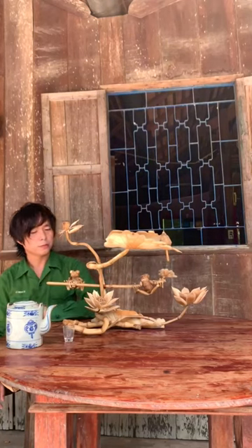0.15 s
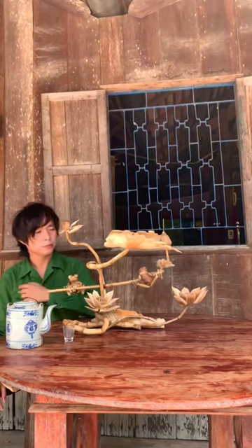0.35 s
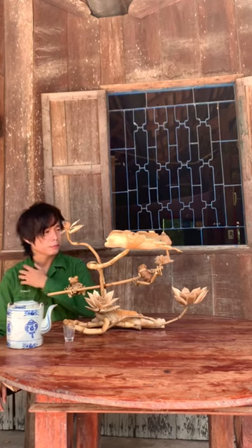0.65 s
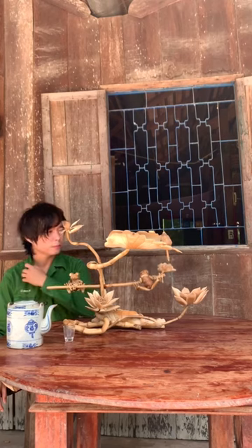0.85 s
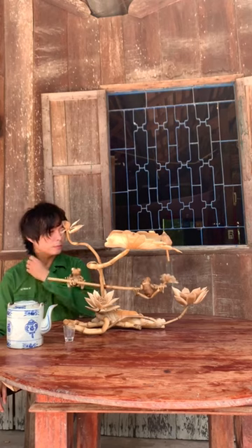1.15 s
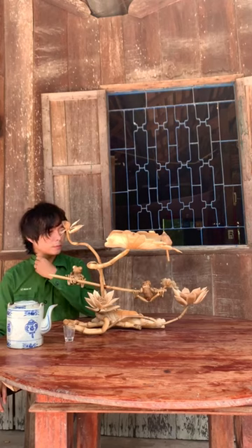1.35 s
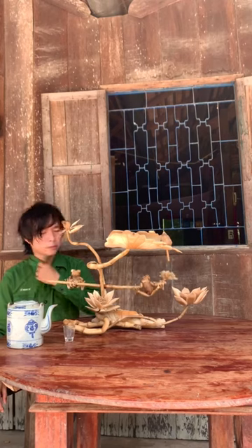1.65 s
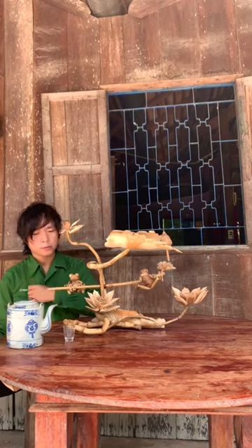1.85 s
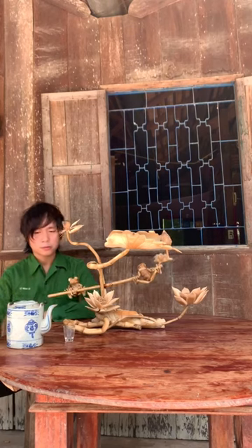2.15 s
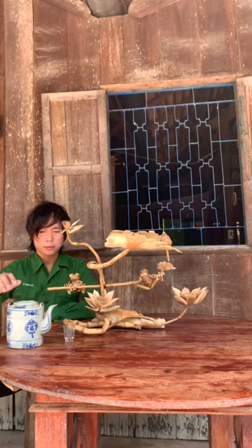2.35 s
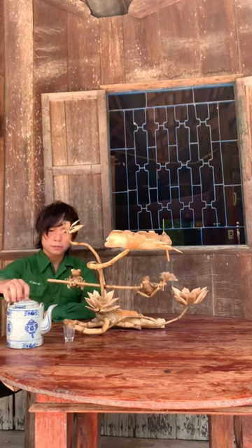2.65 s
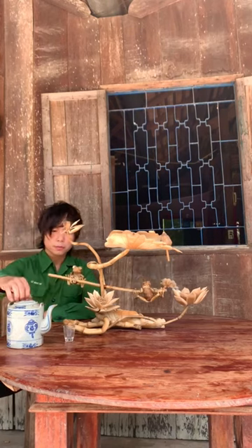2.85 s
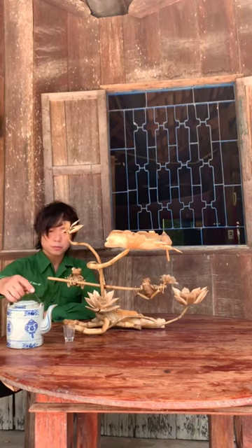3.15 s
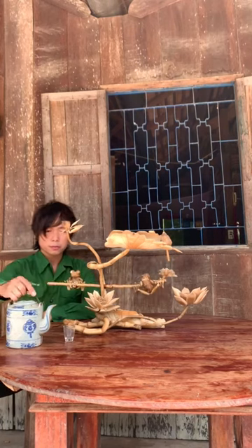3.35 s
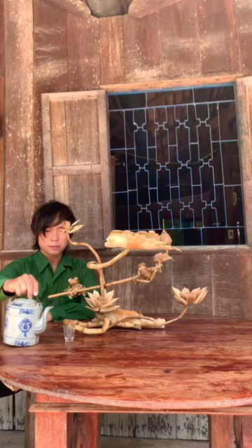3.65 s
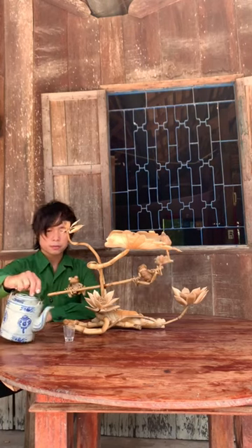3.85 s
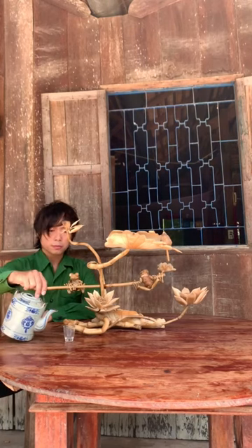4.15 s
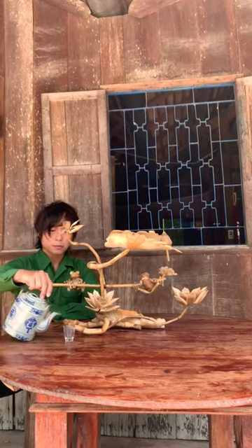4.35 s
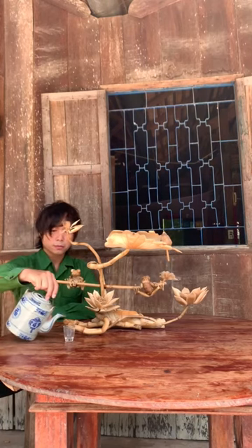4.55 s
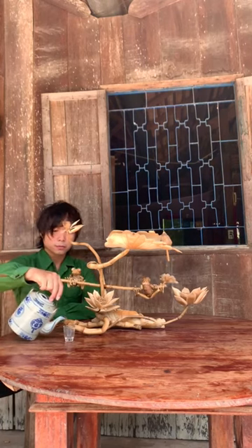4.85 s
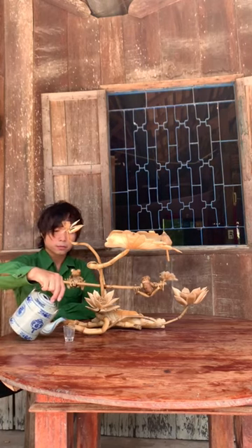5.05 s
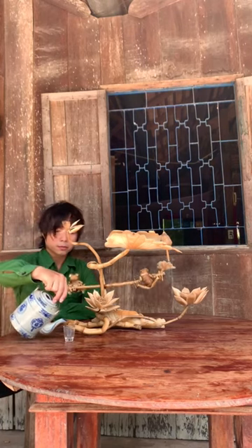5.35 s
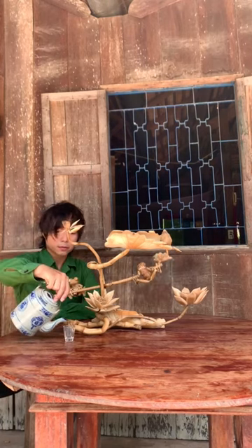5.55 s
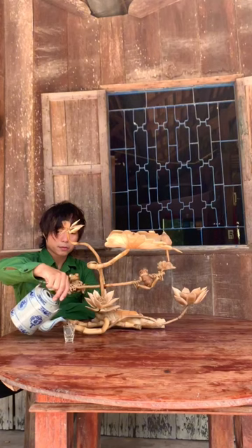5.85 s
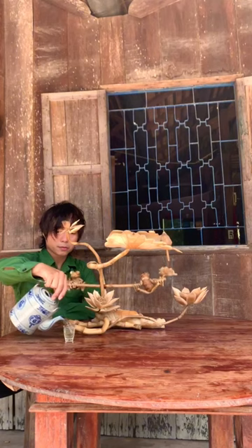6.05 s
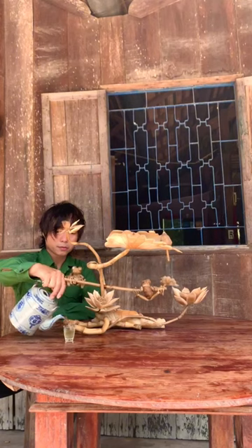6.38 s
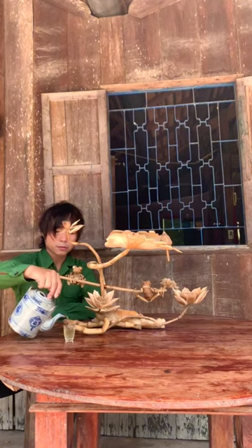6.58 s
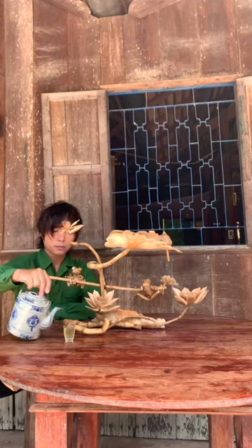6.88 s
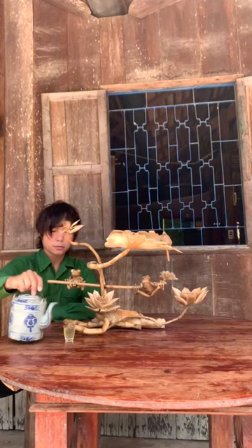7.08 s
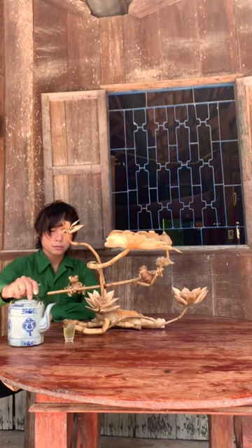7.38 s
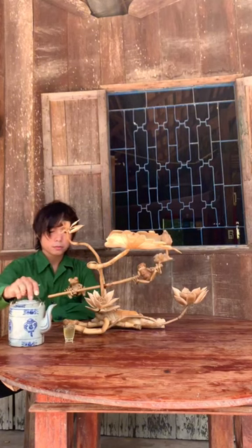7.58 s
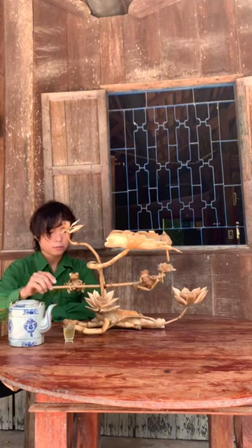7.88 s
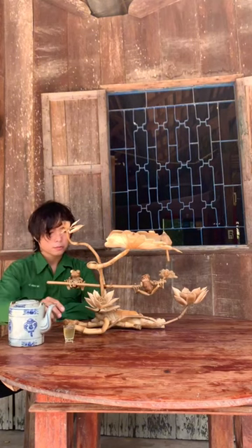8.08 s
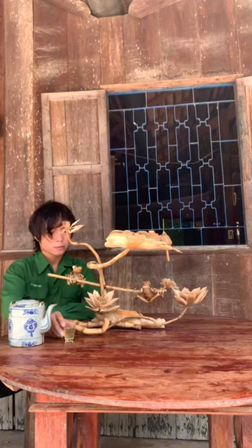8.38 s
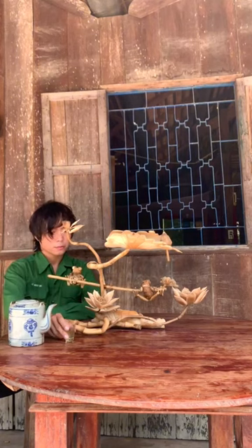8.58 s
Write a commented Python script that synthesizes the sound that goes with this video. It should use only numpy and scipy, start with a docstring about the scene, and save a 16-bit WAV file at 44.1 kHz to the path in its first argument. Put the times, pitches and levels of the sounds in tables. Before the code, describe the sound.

Small woody clicks come close to the microphone: a rattling cluster from one end of a bamboo seesaw, a crisp knock from the other, roughly every two seconds or a little less, with short round water plips between. The wooden table hums very briefly under some blows. Short plank-room reflections, steady airy hiss, and deep fluttering wind thuds that crowd together late, nearly masking a soft teapot set-down.

```python
"""In a plank room, a bamboo seesaw fed by dripping water tips back and forth on a wooden table.
Impacts excite damped modes: one end lands with a bright knock and bounces, the other in a rattling
run of taps; a teapot is set down and its wire handle falls. Drops and the table top ring as sines.
Shaped noise makes wind gusts, falling wobbles more wind at the microphone and a few handling thumps,
over the hiss of the open room; a thin sine whistle, perhaps an insect, sounds once."""
import sys
import numpy as np
from scipy import signal
from scipy.fft import rfft, irfft
from scipy.io import wavfile
from scipy.ndimage import uniform_filter1d

SR = 44100
rng = np.random.default_rng(int(sys.argv[2]) if len(sys.argv) > 2 else 0)


def inscribe(sig):
    """Save sig as 16-bit PCM at rate SR to the path in sys.argv[1].

    A 1-D sig is mono; a 2-D sig holds one channel per row.
    Samples are clipped to [-1, 1] before scaling.
    """
    pcm = np.round(np.clip(np.atleast_2d(sig).T, -1, 1) * 32767)
    wavfile.write(sys.argv[1], SR, pcm.astype(np.int16))


N = 384552  # samples

# Room hiss, relative spectrum: (frequency [Hz], level [dB])
HISS_SPECTRUM = [(150, -56), (300, -3), (500, -2.5), (900, -4.5), (1500, -2), (2500, -7), (4000, -5),
                 (5500, -9), (7500, -11.5), (10000, -14), (13000, -16), (14900, -21.5), (15400, -55),
                 (17000, -60)]
# Slow course of the hiss: (time [s], level [dB])
HISS_LEVEL = [(0, -49.5), (1.5, -49.5), (3, -48), (4.5, -50.5), (5.5, -51), (7, -52), (8.72, -52)]
# Phase of the left channel ahead of the right: (frequency [Hz], difference [half turns])
CHANNEL_PHASE = [(0, 0), (300, 0), (700, -.25), (1700, 0), (2800, .4), (4300, .6), (4900, 1), (5600, 1.4),
                 (6400, 1.95), (7400, 2), (8400, 2.5), (9400, 3), (10000, 3), (11900, 4), (12700, 4),
                 (14300, 5), (15000, 5), (15900, 5.7), (22050, 6)]
# Power share of the hiss that is unlike in the two channels: (frequency [Hz], share [0 to 1])
UNLIKE_SHARE = [(100, .002), (250, 0.068), (500, 0.72), (1000, 0.66), (2500, 1), (5000, 0.59),
                (6400, 0.027), (7400, 0.048), (8400, 0.18), (9300, 0.00018), (10200, 0.00023),
                (11000, 0.45), (12300, .02), (13300, .2), (14200, .002)]

# Deep wind noise, relative spectrum: (frequency [Hz], level [dB])
RUMBLE_SPECTRUM = [(15, -48), (25, -29), (35, -3), (50, 3.5), (80, 3.5), (120, -1), (170, -13.5),
                   (250, -29.5), (500, -120)]
# Faster wind flutter, relative spectrum: (frequency [Hz], level [dB])
FLUTTER_SPECTRUM = [(60, -90), (90, -31), (150, 6), (250, -1.5), (400, -7.5), (700, -28), (1100, -30.5),
                    (1600, -53), (3000, -120)]
# Strength of the wind as its deep rumble: (time [s], level [dB])
WIND_LEVEL = [(0, -49.5), (0.15, -45), (0.48, -55), (0.63, -38), (0.88, -39), (1.05, -51), (2.26, -50.5),
              (2.6, -49), (3.6, -53), (4.7, -50.5), (5.08, -52.5), (5.3, -39), (5.76, -38.5), (6.3, -46),
              (6.6, -39.5), (6.97, -43), (7.2, -38), (7.45, -39.5), (8.0, -42), (8.72, -42)]
# Sudden puffs of wind: (time of crest [s], deep thump level [dB], flutter level [dB])
PUFFS = [(0.295, -48, -62), (0.41, -38, -60), (0.46, -37, -46), (0.51, -43, -60), (0.649, -25.5, -42),
         (0.75, -29.5, -52), (0.85, -35, -61), (1.34, -34.5, -50), (1.504, -43, -48), (1.58, -46, -60),
         (2.21, -44, -41), (3.03, -49, -57), (3.215, -42.5, -67), (3.468, -45, -41), (3.86, -44.5, -56),
         (3.93, -43, -54), (4.49, -45, -65), (4.575, -42, -41.5), (4.78, -35, -60), (5.245, -33, -50),
         (5.293, -26, -38), (5.49, -40, -40.5), (5.66, -28.5, -43), (5.71, -42, -38.5), (5.83, -55, -50),
         (5.9, -28.5, -63), (6.03, -32.5, -47), (6.076, -40, -43), (6.166, -35, -38.5), (6.26, -36, -56),
         (6.371, -27.5, -28), (6.39, -23, -34), (6.476, -24, -37), (6.525, -30.5, -61), (6.585, -37, -48),
         (6.695, -32, -34), (6.725, -23.5, -38), (6.751, -30, -28), (6.79, -36, -35), (6.828, -29.5, -35),
         (6.9, -29, -41), (7.12, -31, -55), (7.2, -37, -36.5), (7.245, -26, -27), (7.295, -31, -31),
         (7.339, -34, -32), (7.48, -41, -36), (7.56, -42, -43), (7.68, -36, -35), (8.059, -32, -41.5),
         (8.33, -43, -39.5), (8.6, -37, -61), (8.715, -54, -36)]
FLUTTER_AT_DB, FLUTTER_FOLLOWS = -56.5, 0.36  # flutter in a wind of -50.5 dB; share of wind swing followed
RUMBLE_LUMPS_DB, LUMPS_CORNER_HZ = 2.5, 14  # random lumpiness of the steady rumble
THUMP_RISE_DB_PER_S, THUMP_FALL_DB_PER_S = 497, 393
FLUTTER_RISE_DB_PER_S, FLUTTER_FALL_DB_PER_S = 746, 520
THUMP_CUT_HZ = 64  # high-pass: a thump is tighter than the steady rumble
WIND_UNLIKE_DB = -29  # part of opposite sign in the two channels

# Falling low wobbles, wind at the microphone and a few handling thumps:
# (start time [s], level before the envelope [dB], starting pitch [Hz])
WOBBLES = [(0.287, -41, 1420), (0.446, -41, 710), (1.489, -39, 660), (1.506, -49, 490), (3.444, -38, 1014),
           (3.456, -33, 420), (3.469, -34, 803), (4.546, -41, 705), (4.563, -47, 750), (5.279, -34, 510),
           (5.475, -33, 610), (6.016, -40, 900), (6.062, -40, 1000), (6.1, -41, 810), (6.108, -40, 900),
           (6.152, -40, 704), (6.173, -42, 694), (6.345, -27, 404), (6.361, -20.5, 425), (6.383, -21, 387),
           (6.463, -23.5, 693), (6.472, -21, 728), (6.588, -36, 450), (6.68, -28.5, 996), (6.697, -29, 690),
           (6.735, -25, 806), (6.75, -28, 790), (6.776, -32.5, 1020), (6.818, -39, 910), (6.862, -39, 1105),
           (7.178, -40, 597), (7.231, -25.5, 716), (7.251, -29, 610), (7.272, -39, 790), (7.288, -27, 690),
           (7.316, -29, 790), (7.331, -20.5, 490), (7.356, -32, 600), (7.461, -31, 710), (8.04, -39, 500),
           (8.304, -32, 590), (8.325, -29, 610), (8.361, -29, 500), (8.414, -44, 503), (8.703, -37, 505)]
WOBBLE_END_HZ, WOBBLE_GLIDE_S, WOBBLE_RISE_S, WOBBLE_FALL_S = 95, 0.00605, 0.0039, 0.02

# Taps of the near end, and small clicks under the last three drops: (time [s], level [dB],
# brightness [dB/octave], favoured pitch [Hz], lift of that pitch [dB], lift of hollow notes [dB])
TAPS = [(0.438, -45.5, -3.5, 2070, 6, 8), (0.542, -41, -2, 1310, 4.1, 3),
        (0.581, -38.5, -1.2, 1810, 3.6, 3), (0.637, -36, 2, 1710, 4.2, 1), (0.655, -49, -4, 1300, 6, 1),
        (0.73, -52, -6.5, 1010, 7, 1), (0.743, -51, 3, 1790, 5, -3), (0.826, -52, 0, 1270, 5.4, 1),
        (0.857, -58.5, 10, 8500, 5.4, 1), (1.977, -44.5, -4, 2070, 6, -2), (2.094, -44, 0, 4000, 9.8, 1),
        (2.125, -42, -0.5, 1290, 5.9, -2), (2.1685, -34, 2, 3400, 5.3, 4),
        (2.18, -44.5, -5.5, 1790, 6.7, 1), (2.213, -49, 4, 3900, 5, 1), (2.583, -58, -9, 1790, 5, 6),
        (3.617, -43.5, -3, 2070, 6, -2), (3.752, -42.5, 2.5, 2210, 4.1, -5), (3.753, -52, 1, 5900, 10, -5),
        (3.789, -40.5, -3.5, 3350, 8, 8), (3.796, -47.5, -7, 1800, 7.3, 4),
        (3.846, -35.5, 0.8, 2100, 5.6, 5), (3.863, -40.5, -3, 1020, 6, 6), (3.897, -45.5, 4, 3100, 3.9, 3),
        (5.477, -46, -7.5, 1780, 4.7, -6), (5.588, -43.5, -2.5, 3160, 7.4, -9),
        (5.591, -50, -3.5, 1300, 8, -3), (5.634, -45, 1.5, 2100, 5.4, 1), (5.644, -43, -5, 3400, 7, -4),
        (5.678, -43, -7, 2100, 5, -3), (5.685, -35, 4, 1780, 7.5, -3), (5.697, -51, -5, 3300, 4.5, 1),
        (7.432, -49.5, -7, 2100, 5.2, -8), (7.439, -55, -8, 1310, 6, -6),
        (7.545, -42.5, -4, 2110, 7.3, -11), (7.553, -48.5, -7.5, 1150, 7, -6),
        (7.61, -41, -1, 3270, 6.9, 3), (7.635, -48.5, -9, 2140, 9.7, -1), (7.649, -46, -6.5, 1800, 5.5, 1),
        (7.655, -37.5, 5, 1800, 7.3, -4), (7.66, -49, -1, 4670, 8.3, 1), (7.665, -48.5, -1.5, 1020, 6, 1),
        (7.703, -46.5, 1.5, 3140, 5, -5), (7.728, -54, 1, 3840, 5.5, -3), (7.774, -48, 1, 1300, 4, -3),
        (7.793, -52, 1.5, 1020, 4, -3), (7.811, -55, -3, 1780, 4, -3)]
# Landings and bounces of the far end, and a last knock probably of the near end: (time [s], level [dB],
# brightness [dB/octave], favoured pitch [Hz], lift of that pitch [dB], lift of hollow notes [dB])
LANDINGS = [(1.272, -36, 3.5, 1770, 4.5, 5), (1.285, -50, 0, 5970, 10, -5), (1.309, -50.5, 1, 3800, 13, -8),
            (1.338, -51.5, -3.5, 1200, 8, -1), (1.356, -49.5, -2.5, 1600, 8, -3),
            (2.791, -35.5, 4.5, 1770, 5.5, 5.5), (2.928, -46, -1.5, 1310, 3, -6),
            (3.017, -47, -0.4, 704, 8, 0.5), (3.022, -59, 1, 4400, 13, -5), (4.65, -34, 4.5, 1780, 6, -3),
            (4.662, -48, -0.5, 3700, 10, 1), (4.689, -59, 8.5, 8200, 0, -3),
            (4.714, -45.5, -1, 820, 5, -2.5), (4.754, -51.5, -2, 1990, 4, 3), (6.3, -38, 7.5, 3880, 3.5, 0),
            (6.346, -42.5, 4, 4020, 5, -3), (6.386, -47.5, 0.5, 4000, 5, -3),
            (6.425, -46.5, 1, 4400, 9, -6), (6.437, -54, 3, 4400, 10, -7), (6.455, -53, -1, 4400, 9, -7),
            (8.296, -36, 4, 1410, 7, -10), (8.34, -43.5, 0, 1850, 7, -8), (8.358, -44.5, -0.6, 1100, 8, -4),
            (8.36, -52, 3, 5970, 13, -6), (8.368, -56, 0, 4270, 16, -6), (8.418, -54.5, 1.5, 1100, 4, -2),
            (8.532, -48.5, -1, 1970, 9.5, -15)]
# Teapot base meeting the table: (time [s], level [dB],
# brightness [dB/octave], favoured pitch [Hz], lift of that pitch [dB], lift of hollow notes [dB])
TEAPOT = [(7.299, -56, -4.5, 1310, 9.3, -2), (7.314, -67, -11, 500, 5, 2), (7.46, -61, -15, 950, 6.9, 0.5),
          (7.474, -64, -10.5, 1250, 4.5, 3)]
# Wire handle falling against the pot: (time [s], level [dB],
# brightness [dB/octave], favoured pitch [Hz], lift of that pitch [dB], lift of hollow notes [dB])
HANDLE = [(7.9065, -55, 8.3, 11900, 5, 1)]
# Modes of the near end: (centre of the pair [Hz], level [dB], t60 [s])
NEAR_END_MODES = [(725, -11, 0.12), (1022, -3, 0.14), (1311, -2.5, 0.1), (1650, -11, 0.033),
                  (1779, 0.5, 0.059), (2120, 0, 0.028), (2420, -5, 0.03), (2760, -3, .025),
                  (3150, 6.5, 0.019), (3485, 5.5, 0.016), (3940, -5, .025), (4670, 1, 0.031),
                  (5700, -8, 0.0099), (8590, 9, 0.0057), (11050, 0, 0.0086), (13000, -8, .01)]
# Modes of the far end: (centre of the pair [Hz], level [dB], t60 [s])
FAR_END_MODES = [(713, 2.5, 0.096), (804, 3.5, 0.07), (1170, -4, 0.031), (1320, 2.5, 0.038),
                 (1770, 3.5, 0.065), (2020, 3.7, 0.024), (3320, -7, 0.074), (3720, 1.5, 0.049),
                 (3960, 1, 0.067), (4436, 4, 0.025), (5860, -1, 0.012), (6920, -16, 0.023),
                 (8310, 2, 0.012), (8620, -4, 0.022), (11100, 1, 0.0059), (12800, 0.5, 0.0068)]
# Modes of the teapot: (centre of the pair [Hz], level [dB], t60 [s])
POT_MODES = [(490, -2, 0.078), (650, 3, .06), (943, 2.5, 0.043), (1294, 11, 0.051), (1900, -3, .03),
             (2200, -5, .02)]
# Modes of the wire handle: (centre of the pair [Hz], level [dB], t60 [s])
WIRE_MODES = [(5950, 3, .03), (7060, -10, .015), (8900, -2, .015), (10000, 7, .012), (11300, 0, .025),
              (12000, -1, 0.081), (12950, -2, .025), (12900, 0, .02)]
# Four colour bands: (centre [Hz])
BAND_HZ = [900, 1900, 3400, 8500]
# Upper edge of each band, where its outer limit is not lower: (edge over centre [ratio])
TOP_REACH = [1.6, 1.4, 1.38, 2.1]
# Colour of near end, far end and pot per band at brightness 0: (level [dB])
NEAR_COLOUR_DB = [-5, 0.5, -1.5, -3]
FAR_COLOUR_DB = [0, -1.5, -0.5, 4]
POT_COLOUR_DB = [10.5, -2, -1.5, 8]
PIVOT_HZ = 2600  # brightness tilts about this pitch
HOLLOW_HZ, FAVOUR_OCTAVES = 900, 0.19  # hollow notes lie below; width of the favoured lift
TWIN_SPLIT = .009  # each mode is a pair, this share above and below its centre
TOUCH_S, TOUCH_DIP_DB = .005, 18  # nominal spacing of rebounds; the chatter sinks between touches
MAIN_BLOW_DB, CHATTER_DB = -6.5, -2.5  # shares of the clean blow and of the chatter in the ring
BRIEF_ABOVE_HZ = 5200  # the chatter is shorter above this
RING_SCATTER_DB = 2  # no two blows strike the modes alike
LANDING_CRACK_DB, TAP_CRACK_DB = 20, 21.5
CRACK_DROP_DB = 14  # the crack weakens by this from band to band downwards
ROOM_T60_S, ROOM_DB, WALL_CUT_HZ = 0.16, -9.5, 8900

# Drops falling into the small bamboo cup: (time [s], level before a common lift and envelope [dB], pitch [Hz])
DROPS = [(0.7647, -39, 3250), (2.3392, -40, 3320), (2.3496, -46, 3290), (2.3626, -42, 3220),
         (3.987, -37.5, 3260), (3.997, -45, 3220), (4.01, -45, 3320), (5.8366, -32.5, 3250),
         (5.861, -41, 3270), (7.7737, -35.5, 3260), (7.7925, -39, 3180), (7.811, -48, 3400)]
DROP_ROUGH, TABLE_ROUGH = .2, .3  # random waver of these rings [share]
# Blows that make the table top hum: (time [s], push level before smoothing [dB])
THUDS = [(1.285, -39), (1.98, -37.5), (2.18, -39.5), (3.629, -34.5), (4.67, -45)]
TABLE_HZ, TABLE_T60_S, TABLE_RISE_S = 280, 0.15, 0.0097
# Thin whistle, perhaps an insect: (start time [s], end time [s], pitch [Hz], level [dB])
WHISTLE = (2.915, 3, 13093, -46)
CUTOFF_HZ = 16800


def from_db(db):
    """Logarithmic level: 20 dB is a factor of ten in amplitude."""
    return 10 ** (np.asarray(db) / 20)


def rms_one(x):
    """Normalisation: the mean square is brought to one."""
    return x / np.sqrt(np.mean(x ** 2) + 1e-20)


def at_hz(points, hz):
    """Logarithmic frequency scale: a table is interpolated linearly in log frequency."""
    table_hz, values = np.transpose(points)
    return np.interp(np.log(np.maximum(hz, 1)), np.log(table_hz), values)


def coloured(spectrum, channels=1):
    """Spectral shaping: white noise is weighted by frequency and brought to unit rms."""
    hz = np.arange(N // 2 + 1) * SR / N
    white = rfft(rng.standard_normal((channels, N)))
    return rms_one(irfft(white * from_db(at_hz(spectrum, hz)), N))


def drift(corner_hz):
    """Low-pass random process: two equal poles leave slow chance of unit spread."""
    step = 40  # samples between computed values
    warm_up = 2000
    r = np.exp(-2 * np.pi * corner_hz * step / SR)
    white = rng.standard_normal(N // step + warm_up + 2)
    slow = signal.lfilter([1], [1, -2 * r, r * r], white)[warm_up:]
    return np.interp(np.arange(N) / step, np.arange(len(slow)), rms_one(slow))


def evened(x, seconds):
    """Envelope compression: noise is divided by its own running rms."""
    power = uniform_filter1d(x ** 2, int(seconds * SR))
    return rms_one(x / np.sqrt(power + 0.041))


def phase_spread(x):
    """Interchannel phase: left and right are set apart by a difference tabled over frequency."""
    hz = np.arange(N // 2 + 1) * SR / N
    half = np.pi * np.interp(hz, *np.transpose(CHANNEL_PHASE)) / 2
    return irfft(rfft(x) * np.exp(1j * np.array([half, -half])), N)


def hiss():
    """Partial coherence: hiss mixes a common and an unlike part, the share set by frequency."""
    hz = np.arange(N // 2 + 1) * SR / N
    share = np.clip(at_hz(UNLIKE_SHARE, hz), 0, 1)
    common, left, right = rfft(coloured(HISS_SPECTRUM, channels=3))
    common = phase_spread(irfft(common * np.sqrt(1 - share), N))
    unlike = irfft(np.array([left, right]) * np.sqrt(share), N)
    level_db = np.interp(np.arange(N) / SR, *np.transpose(HISS_LEVEL)) + .5 * drift(4.7)
    return from_db(level_db) * (common + unlike)


def crests(t, crest_s, crest_db, rise, fall):
    """Power addition: each puff rises and falls straight in dB, and the powers sum."""
    since = t[:, None] - crest_s
    drop_db = np.where(since < 0, -rise * since, fall * since)
    return np.sqrt(from_db(2 * (crest_db - drop_db)).sum(axis=1))


def wind():
    """Turbulent pressure: lumpy low noise at the microphone, nearly alike in both channels."""
    crest_s, thump_db, flutter_db = np.transpose(PUFFS)
    t = np.arange(N) / SR
    coarse = np.arange(0, N / SR + .002, .002)
    steady_db = np.interp(t, *np.transpose(WIND_LEVEL))
    thumps = crests(coarse, crest_s, thump_db, THUMP_RISE_DB_PER_S, THUMP_FALL_DB_PER_S)
    thumps = np.interp(t, coarse, thumps)
    flaps = crests(coarse, crest_s, flutter_db, FLUTTER_RISE_DB_PER_S, FLUTTER_FALL_DB_PER_S)
    flaps = np.interp(t, coarse, flaps)

    both, unlike, deep = coloured(RUMBLE_SPECTRUM, channels=3)
    steady = from_db(steady_db + RUMBLE_LUMPS_DB * drift(LUMPS_CORNER_HZ))
    high_pass = signal.butter(2, THUMP_CUT_HZ, "high", fs=SR, output="sos")
    tight = rms_one(signal.sosfilt(high_pass, deep))
    rumble = evened(both, 0.0513) * steady + evened(tight, 0.031) * thumps
    rumble = rumble + from_db(WIND_UNLIKE_DB) * unlike * (steady + thumps) * [[1], [-1]]

    steady_flutter = from_db(FLUTTER_AT_DB + FLUTTER_FOLLOWS * (steady_db + 50.5))
    flutter_gain = np.hypot(steady_flutter, flaps) * from_db(3.06 * drift(26.5))
    return rumble + evened(coloured(FLUTTER_SPECTRUM)[0], 0.0237) * flutter_gain


def wobbles():
    """Frequency glide: wind and handling thumps are swelling, dying sines that fall in pitch."""
    out = np.zeros(N + SR)
    t = np.arange(SR // 10) / SR
    envelope = (1 - np.exp(-t / WOBBLE_RISE_S)) * np.exp(-t / WOBBLE_FALL_S)
    for (start_s, level_db, start_hz), phase in zip(WOBBLES, rng.random(len(WOBBLES))):
        hz = WOBBLE_END_HZ + (start_hz - WOBBLE_END_HZ) * np.exp(-t / WOBBLE_GLIDE_S)
        turns = np.cumsum(hz) / SR + phase
        at = round(start_s * SR)
        out[at:at + len(t)] += from_db(level_db) * envelope * np.sin(2 * np.pi * turns)
    return out[:N]


def ring(force, hz, t60):
    """Damped resonance: a unit click sets off a decaying sine of height one."""
    r, w = from_db(-60 / (t60 * SR)), 2 * np.pi * hz / SR
    return signal.lfilter([0, np.sin(w)], [1, -2 * r * np.cos(w), r * r], force + 1e-18)


def dying(at, level_db, t60, rise_s):
    """Exponential relaxation: an envelope swells quickly at each blow and decays."""
    clicks, r = np.zeros(N), np.exp(-1 / (rise_s * SR))
    clicks[at] = from_db(level_db)
    poles = np.convolve([1, -r], [1, -from_db(-60 / (t60 * SR))])
    return signal.lfilter([1 - r], poles, clicks + 1e-18)


def rebounds(at):
    """Repeated contact: parts touch again at a spacing drawn for each blow, sinking between."""
    samples = np.arange(N)
    last = np.clip(np.searchsorted(at, samples, side="right") - 1, 0, None)
    spacing = TOUCH_S * SR * rng.uniform(.8, 1.25, len(at))
    since_touch = (samples - at[last]) / spacing[last] % 1
    return rms_one(from_db(-TOUCH_DIP_DB * since_touch))


def modal_ring(rows, at, bands_db, modes, ring_db, chatter_t60, touches):
    """Modal superposition: a clean blow and chattering contact drive paired resonances."""
    out = np.zeros(N)
    _, _, _, favoured_hz, favoured_db, hollow_db = rows.T
    twins = [(hz * (1 + side * TWIN_SPLIT), level_db - 3, t60)
             for hz, level_db, t60 in modes for side in (-1, 1)]
    chance = rng.standard_normal((len(rows), len(twins)))
    chatter = touches * rng.standard_normal((3, N))
    for k, (hz, level_db, t60) in enumerate(twins):
        here_db = np.array([np.interp(np.log(hz), np.log(BAND_HZ), row) for row in bands_db])
        blow_db = here_db + level_db + ring_db + RING_SCATTER_DB * chance[:, k]
        octaves_off = np.log2(hz / favoured_hz)
        blow_db = blow_db + favoured_db * np.exp(-(octaves_off / FAVOUR_OCTAVES) ** 2)
        blow_db = blow_db + hollow_db * (hz < HOLLOW_HZ)
        # only the first hard touches reach the top modes
        lasts = chatter_t60 * min(1, (BRIEF_ABOVE_HZ / hz) ** 2)
        force = dying(at, blow_db + CHATTER_DB, lasts, 2.6 / hz) * chatter[k % 3]
        force = force / np.sqrt(lasts * SR / 14)
        # the main blow comes 3.5 cycles late, so latest in the low modes
        force[at + int(3.5 * SR / hz)] += from_db(blow_db + MAIN_BLOW_DB) * (-1) ** (k // 2)
        out += ring(force, hz, t60)
    return out


def crack_and_rattle(at, bands_db, crack_db, rattle_db, rattle_t60, touches):
    """Broadband contact: a sharp push and loose joints' dying noise, coloured by band."""
    out = np.zeros(N)
    edges = [680, 1400, 2500, 5400, 18000]  # outer limits of the bands [Hz]
    for k, centre_hz in enumerate(BAND_HZ):
        level_db = bands_db[:, k]
        # the crack is mostly treble
        crack = dying(at, level_db + crack_db - CRACK_DROP_DB * (3 - k), .001, .00003)
        # low bands start later and die more slowly
        t60 = rattle_t60 * (1800 / centre_hz) ** 0.19
        rattle = dying(at, level_db + rattle_db, t60, 0.00085 + 2.6 / centre_hz)
        rattle = rattle * touches * rng.standard_normal(N)
        top = min(edges[k + 1], centre_hz * TOP_REACH[k])
        band = signal.butter(2, [edges[k], top], "band", fs=SR, output="sos")
        width_gain = np.sqrt(SR / 2 / (edges[k + 1] - edges[k]))
        out += signal.sosfilt(band, crack + rattle) * width_gain
    return out


def struck(events, colour_db, modes, ring_db, crack_db, rattle_db, chatter_t60, rattle_t60):
    """Impact excitation: each blow cracks, chatters into the modes and rattles loose joints."""
    rows = np.array(events)
    tilt_octaves = np.log2(np.array(BAND_HZ) / PIVOT_HZ)
    bands_db = rows[:, 1:2] + colour_db + rows[:, 2:3] * tilt_octaves
    # each blow starts one millisecond after its table time
    at = np.round((rows[:, 0] + .001) * SR).astype(int)
    touches = rebounds(at)
    ringing = modal_ring(rows, at, bands_db, modes, ring_db, chatter_t60, touches)
    return ringing + crack_and_rattle(at, bands_db, crack_db, rattle_db, rattle_t60, touches)


def taps_and_clicks():
    """Modal impact: taps of the near end, and small clicks under the last three drops."""
    return struck(TAPS, NEAR_COLOUR_DB, NEAR_END_MODES, ring_db=1.5, crack_db=TAP_CRACK_DB,
                  rattle_db=-5.0, chatter_t60=0.037, rattle_t60=0.11)


def room(x):
    """Reverberation: plank walls and table return a dense decaying tail, separate per channel."""
    t = np.arange(int(.3 * SR)) / SR
    onset = np.clip((t - .003) / 0.0011, 0, 1)
    tail = rng.standard_normal((2, len(t))) * from_db(-60 * t / ROOM_T60_S) * onset
    low_pass = signal.butter(2, WALL_CUT_HZ, fs=SR, output="sos")
    tail = rms_one(signal.sosfilt(low_pass, tail)) / np.sqrt(len(t))
    return from_db(ROOM_DB) * signal.fftconvolve(x[None], tail)[:, :N]


def drops():
    """Transient resonance: each drop in the cup gives one short round ring."""
    out = np.zeros(N)
    t = np.arange(SR // 10) / SR
    for start_s, level_db, hz in DROPS:
        at = round(start_s * SR)
        envelope = from_db(level_db + 7.5 - 60 * t / 0.017) * (1 - np.exp(-t / 0.00023))
        out[at:at + len(t)] += envelope * np.sin(2 * np.pi * hz * t)
    return out * (1 + DROP_ROUGH * drift(220))


def landings_and_last_knock():
    """Modal impact: the far end lands and bounces; a last knock is probably the near end's."""
    return struck(LANDINGS, FAR_COLOUR_DB, FAR_END_MODES, ring_db=0.0, crack_db=LANDING_CRACK_DB,
                  rattle_db=-5, chatter_t60=0.068, rattle_t60=0.086)


def table():
    """Plate vibration: a soft push sets the lowest mode of the table top humming."""
    push_s, push_db = np.transpose(THUDS)
    at = np.round(push_s * SR).astype(int)
    swell = dying(at, push_db, TABLE_T60_S, TABLE_RISE_S)
    hum = np.sin(2 * np.pi * TABLE_HZ * np.arange(N) / SR)
    return swell * (1 + TABLE_ROUGH * drift(45)) * hum


def whistle():
    """Pure tone: a sine of steady frequency swells and fades under a half-sine envelope."""
    start, end, hz, level_db = WHISTLE
    t = np.arange(N) / SR
    swell = np.sin(np.pi * np.clip((t - start) / (end - start), 0, 1))
    return from_db(level_db) * swell * np.sin(2 * np.pi * hz * t)


def teapot():
    """Modal impact: the base of the pot is set down on the table."""
    return struck(TEAPOT, POT_COLOUR_DB, POT_MODES, ring_db=-7.5, crack_db=22,
                  rattle_db=-9.5, chatter_t60=0.017, rattle_t60=0.072)


def handle():
    """Modal impact: the wire handle falls against the pot."""
    return struck(HANDLE, POT_COLOUR_DB, WIRE_MODES, ring_db=-5, crack_db=17,
                  rattle_db=-4, chatter_t60=0.072, rattle_t60=0.07)


def scene():
    """Superposition: direct and reverberant sounds add to the wind and hiss."""
    knocks = taps_and_clicks() + landings_and_last_knock() + teapot() + handle()
    knocks += drops() + table()
    direct = phase_spread(knocks + whistle())
    return direct + room(knocks) + wind() + wobbles() + hiss()


def record(dry):
    """Band limitation: a steep low-pass filter removes the top of the spectrum."""
    low_pass = signal.cheby2(12, 70, CUTOFF_HZ, fs=SR, output="sos")
    return signal.sosfilt(low_pass, dry)


dry = scene()
out = record(dry)
inscribe(out)
```